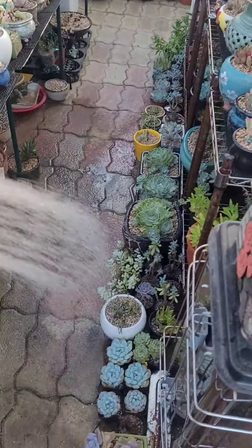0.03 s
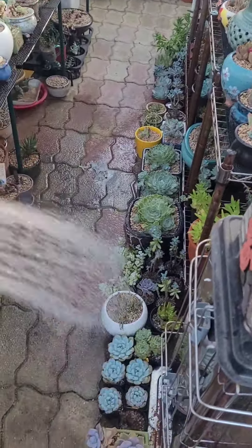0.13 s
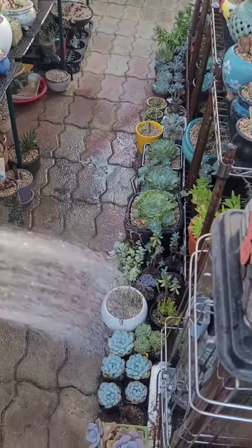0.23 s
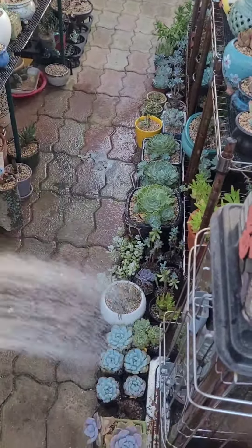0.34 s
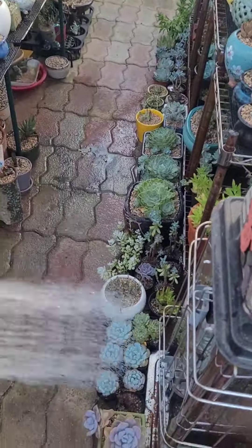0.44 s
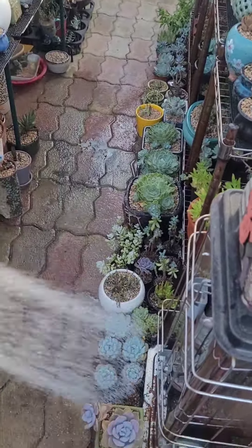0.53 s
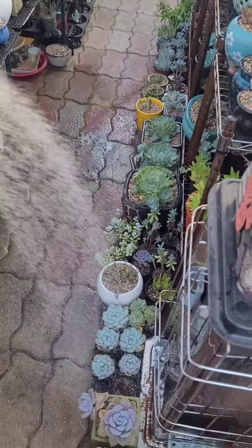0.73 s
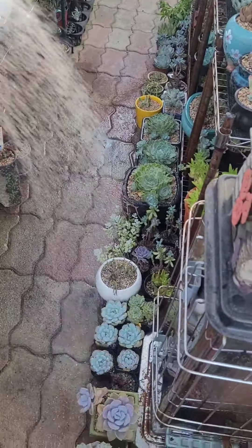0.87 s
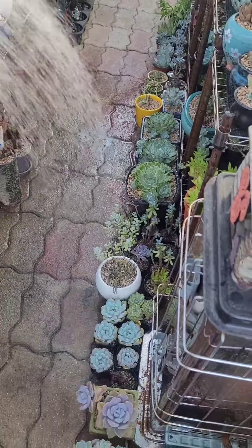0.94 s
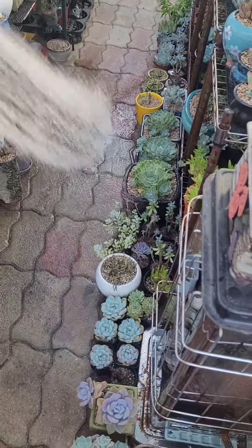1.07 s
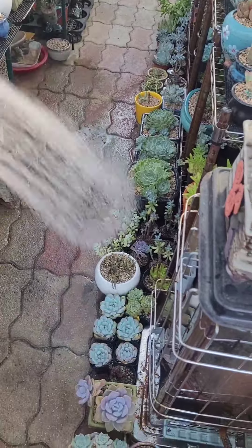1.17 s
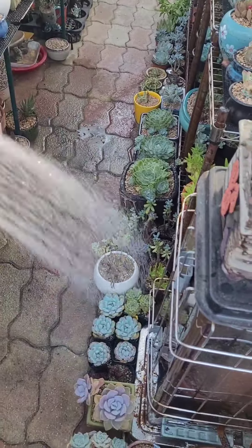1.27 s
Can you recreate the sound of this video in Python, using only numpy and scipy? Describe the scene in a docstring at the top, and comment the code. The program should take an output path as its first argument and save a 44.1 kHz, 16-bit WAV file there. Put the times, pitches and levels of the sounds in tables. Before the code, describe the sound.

Water from a hose hisses on the left in a yard, splashing lightly on a pot, then sweeping across leaves and paving. Low microphone handling rumble sits on the right, with light taps and a few dull thumps.

```python
"""Hose spray on plants and paving

On the left a fine spray sweeps over potted plants and paving; jet noise and tiny impacts make a hiss
whose colour follows the aim. Heavier drops patter on leaves, drum in a pot and a tub and ring on rims,
and gouts of water slap a pot. On the right the hand holding the microphone makes structure-borne
sound: a rumble, light taps and a few dull thumps, one of them firm."""
import sys
import numpy as np
from scipy import signal
from scipy.fft import rfft, irfft
from scipy.io import wavfile
from scipy.ndimage import uniform_filter1d, map_coordinates

SR = 44100
rng = np.random.default_rng(int(sys.argv[2]) if len(sys.argv) > 2 else 0)


def unload_wav(signal):
    """Save mono or channel-first audio to the path in sys.argv[1] as 16-bit WAV at rate SR, clipped to [-1, 1]."""
    wavfile.write(
        sys.argv[1],
        SR,
        np.round(np.clip(np.atleast_2d(signal).T, -1, 1) * 32767).astype(np.int16),
    )


N = 57330
TIME = np.arange(N) / SR
FREQS = np.arange(N // 2 + 1) * SR / N

# aim of the nozzle: (time [s], place [0 pots, 1 low plants, 2 air, 3 paving further off])
NOZZLE_AIM = [(0, 0), (.2, 0), (.28, .55), (.38, 1), (.67, 1), (.73, 1.7), (.86, 2.05), (.94, 3)]
# spectrum of the hiss at each place: (frequency [Hz], relative level [dB])
HISS_ON_POTS = [(1410, -18), (2400, -13), (2650, -15.5), (3250, -5), (4000, -10.5), (4350, -9), (4900, -10),
                (5800, -8.5), (6400, -9.5), (7900, -14.5), (8450, -6), (9200, -6), (10500, 2), (11200, -4),
                (12500, -8), (13300, -4.5), (15700, -8.5)]
HISS_ON_PLANTS = [(1410, -27), (2400, -9.5), (2800, -3.5), (3170, 4.5), (3550, -5), (4400, -4.5),
                  (4950, -4), (5230, -12.5), (5500, -3), (6100, 0), (6450, -7.5), (8000, -8), (8350, 0.5),
                  (9000, 4.5), (10400, 0.5), (11800, 1.5), (12500, -6.5), (13300, 2.5), (14800, -4),
                  (15700, -4)]
HISS_IN_AIR = [(1410, -47), (2400, -27), (2750, -24), (3100, -9), (4200, -7.5), (4900, -12.5), (5900, -9.5),
               (6300, -19), (6650, -9), (7900, -13.5), (8400, -7.5), (10400, 3.5), (11500, -4), (12600, -7),
               (13900, 0.5), (15700, -5)]
HISS_ON_PAVING = [(1410, -36), (2400, -10.5), (2950, -4.5), (3330, -10.5), (3550, -7.5), (3870, -12),
                  (4150, -5), (4450, -10), (5400, -8.5), (5900, -5.5), (6480, -13.5), (6900, -7.5),
                  (8100, -6.5), (9000, -1), (9950, 4), (11700, -5.5), (12400, 0), (13100, -3.5), (13900, 0),
                  (15700, -6.5)]
# envelope of the hiss: (time [s], relative level [dB])
HISS_ENVELOPE = [(0.0, -39.5), (0.24, -40), (0.37, -42.5), (0.405, -41), (0.66, -41.5), (.78, -40),
                 (.89, -41.5), (1.0, -40), (1.3, -41.5)]
# envelopes of the drops on leaves, in a pot and on a hollow tub: (time [s], level [dB])
LEAF_ENVELOPE = [(0, -52), (.15, -55), (.37, -61), (.42, -55.5), (.51, -50), (.56, -58), (.61, -54.5),
                 (.7, -58), (.86, -56.5), (.95, -68.5), (1.04, -58), (1.3, -56.5)]
POT_ENVELOPE = [(0, -50.5), (.13, -54.5), (.17, -59.5), (.31, -62.5), (.39, -68), (.65, -68.5),
                (.88, -63.5), (1.3, -83)]
TUB_ENVELOPE = [(0, -73.5), (.42, -63.5), (.57, -65), (.7, -75), (1.3, -84.5)]
# responses of those surfaces: (frequency [Hz], relative level [dB])
LEAF_SPECTRUM = [(600, -57), (1200, -13), (1600, -6.5), (2200, -0.5), (2800, -4.5), (3800, -25),
                 (8000, -44)]
POT_SPECTRUM = [(300, -29), (560, -12), (800, 0), (1300, -1), (1750, 0.5), (2400, -11), (5000, -34)]
TUB_SPECTRUM = [(200, -19.5), (340, -3.5), (460, -11), (570, -20), (1200, -53)]
# three notches in the spray's spectrum, one track each: (time [s], frequency [Hz], gain [dB])
NOTCH_TRACKS = [
    [(.24, 3850, 0), (.35, 4000, -8), (.45, 4120, -12), (.56, 4150, -14), (.72, 3850, 0)],
    [(0, 7050, -3), (.27, 7250, -14), (.41, 7250, -3), (.6, 7250, -1), (.7, 7100, -9), (.83, 7050, -6),
     (.9, 7000, 0)],
    [(.15, 9200, -1), (.3, 9350, -10), (.45, 9480, -9), (.67, 9350, -5), (.85, 8700, 0)],
]
# reflection from a surface that comes closer as the hose moves: (time [s], delay [s])
NEAR_DELAY = [(.8, .000978), (.96, .000932)]
# spectra of the yard, the covered microphone's hiss and the rumble: (frequency [Hz], relative level [dB])
YARD_SPECTRUM = [(58, 8.5), (110, -5), (200, 1), (600, -7.5), (1500, -4), (6000, -39)]
COVERED_SPECTRUM = [(1000, -17), (4000, -19), (7500, -29.5), (10500, -20), (13000, -2), (15800, -7)]
RUMBLE_SPECTRUM = [(10, -14.5), (24, -6), (37, -4.5), (54, 2), (68, -4), (88, -18.5), (125, -22.5),
                   (180, -38), (300, -44.5), (600, -61.5), (2000, -80)]
# envelope of the handling rumble: (time [s], level [dB])
RUMBLE_ENVELOPE = [(0, -31), (.1, -34), (.22, -31), (.4, -35.5), (.47, -34), (.53, -43), (.57, -33),
                   (.67, -35), (.72, -37.5), (.9, -39), (1.0, -36.5), (1.1, -38.5), (1.23, -36.5),
                   (1.3, -42.5)]
# finger taps on the casing: (time [s], impulse level [dB])
FINGER_TAPS = [(0.057, -48.5), (0.194, -46), (0.235, -45), (.258, -44.5), (0.29, -46.5), (0.411, -57)]
# casing modes excited by a tap: (frequency [Hz], gain [dB], T60 [s])
LOW_CASING_MODES = [(134, 12.5, 0.013), (216, 4, 0.02)]
# gouts of water hitting a pot: (time [s], smack level [dB], splash level [dB], splash T60 [s])
GOUTS = [(.09, -35, -44, 0.039), (.1215, -42, -54, 0.02), (.1285, -37, -50, 0.022),
         (0.2093, -31.5, -41, 0.075), (0.2312, -41, -47, 0.028), (1.02, -61, -55, 0.15),
         (1.244, -67, -57, 0.059)]
# spectrum of their splash: (frequency [Hz], relative level [dB])
SPLASH_SPECTRUM = [(400, -31), (750, -1), (1600, 1), (2100, 8.5), (2700, -14), (6000, -39)]
# large drops striking rims: (time [s], frequency [Hz], level [dB])
RIM_DROPS = [(.209, 2027, -38), (.419, 2260, -42), (1.04, 2050, -49), (1.128, 2580, -38.5),
             (1.164, 2800, -38.5)]
# bumps on the casing, the firm one first: (time [s], level [dB], attack [s], initial pitch offset [Hz])
CASING_BUMPS = [(0.3247, -7.5, 0.0045, 107), (0.372, -25, 0.0059, 12), (0.616, -28.5, 0.011, 12),
                (1.136, -27, 0.011, -22)]
# casing modes excited by the firm bump: (frequency [Hz], level [dB], T60 [s])
HIGH_CASING_MODES = [(468, -43.5, 0.076), (696, -56, 0.078), (940, -55, 0.035)]


def from_db(db):
    """Amplitude grows tenfold for every 20 dB."""
    return 10 ** (np.asarray(db) / 20)


def rms_one(x):
    """Normalisation to unit rms fixes the mean power."""
    return x / np.sqrt(np.mean(x ** 2) + 1e-20)


def in_time(rows):
    """Linear interpolation joins (time, value) rows into a curve."""
    return np.interp(TIME, *np.transpose(rows))


def coloured(x, spectrum):
    """Filtering multiplies the spectrum of x by a response; the result has unit rms."""
    hz, db = np.transpose(spectrum)
    response = from_db(np.interp(np.log(FREQS + 1), np.log(hz), db))
    return rms_one(irfft(rfft(x) * response, N))


def noise():
    """Independent samples have a flat mean spectrum: white noise."""
    return rng.standard_normal(N)


def drift(corner_hz):
    """Low-pass filtering turns noise into a slow fluctuation of unit rms."""
    return rms_one(irfft(rfft(noise()) / (1 + (FREQS / corner_hz) ** 2), N))


def drops(per_s, spread_db):
    """Independent impacts form shot noise of unit rms; a spread makes a few of them larger."""
    sizes = from_db(spread_db * np.minimum(rng.exponential(1, N), 4))
    signs = rng.choice([-1, 1], N)
    hits = rng.random(N) < per_s / SR
    return rms_one(sizes * signs * hits)


def decay(age, t60):
    """Damping lowers a vibration exponentially, by 60 dB in t60 seconds."""
    return np.exp(-np.log(1000) * age / t60)


def ring(clicks, hz, t60):
    """A damped resonator answers a unit impulse with a sine decaying from height 1."""
    radius, angle = decay(1 / SR, t60), 2 * np.pi * hz / SR
    return signal.lfilter([0, np.sin(angle)], [1, -2 * radius * np.cos(angle), radius ** 2], clicks)


def mist(droplet_share=0.31, low_cut_hz=2170, gain_db=6, flutter_db=1):
    """Incoherent sources add in power: jet noise and fine droplets, coloured by the nozzle's aim."""
    aim, hiss = in_time(NOZZLE_AIM), 0
    for place, spectrum in enumerate((HISS_ON_POTS, HISS_ON_PLANTS, HISS_IN_AIR, HISS_ON_PAVING)):
        jet = np.sqrt(1 - droplet_share) * noise()
        droplets = np.sqrt(droplet_share) * drops(per_s=12000, spread_db=2.5)
        crossfade = np.sqrt(np.maximum(1 - abs(aim - place), 0))
        hiss = hiss + crossfade * coloured(jet + droplets, spectrum)
    hiss = signal.sosfilt(signal.butter(3, low_cut_hz, "high", fs=SR, output="sos"), hiss)
    return hiss * from_db(in_time(HISS_ENVELOPE) + gain_db + flutter_db * drift(corner_hz=20))


def patter():
    """Impact excitation: leaves, pot and tub each filter the heavier drops by their own response."""
    leaves = coloured(drops(per_s=900, spread_db=1), LEAF_SPECTRUM) * from_db(in_time(LEAF_ENVELOPE))
    pot = coloured(drops(per_s=1200, spread_db=0), POT_SPECTRUM) * from_db(in_time(POT_ENVELOPE))
    tub = coloured(drops(per_s=1200, spread_db=0), TUB_SPECTRUM) * from_db(in_time(TUB_ENVELOPE))
    return leaves + pot + tub


def sliding_notches(x, width_hz=330):
    """Cancellation hollows out narrow bands, which slide and deepen as the jet moves."""
    lowpass = signal.butter(2, width_hz / 2, fs=SR)
    for track in NOTCH_TRACKS:
        times, hz, db = np.transpose(track)
        carrier = np.exp(2j * np.pi * np.cumsum(np.interp(TIME, times, hz)) / SR)
        # shift the band down to 0 Hz, isolate it and shift it back
        baseband = signal.filtfilt(*lowpass, x / carrier, padtype="even")
        band = 2 * np.real(carrier * baseband)
        x = x - (1 - from_db(np.interp(TIME, times, db))) * band
    return x


def early_reflections(x, far_delay_s=0.001268, gain_db=-25):
    """Interference with inverted reflections from two nearby surfaces comb-filters the spray."""
    reflected = sum(map_coordinates(x, [(TIME - delay) * SR], order=3, mode="mirror")
                    for delay in (in_time(NEAR_DELAY), far_delay_s))
    return x - from_db(gain_db) * reflected


def background(spectrum, level_db):
    """Stationary noise makes a faint floor of constant colour and level."""
    return from_db(level_db) * coloured(noise(), spectrum)


def rumble(smoothing_s=0.08):
    """Forced vibration: the grip shakes the casing around its low resonance."""
    shake = coloured(noise(), RUMBLE_SPECTRUM)
    power = np.abs(signal.hilbert(shake)) ** 2
    for _ in range(2):
        power = uniform_filter1d(power, int(smoothing_s * SR))
    steady_shake = rms_one(shake / np.sqrt(power))  # the grip keeps an even pressure
    return steady_shake * from_db(in_time(RUMBLE_ENVELOPE))


def taps(cutoff_hz=365):
    """Fingers excite the casing's low modes; a soft contact passes no treble."""
    clicks = np.zeros(N)
    for onset, db in FINGER_TAPS:
        clicks[int(onset * SR)] = from_db(db)
    rings = sum(from_db(db) * ring(clicks, hz, t60) for hz, db, t60 in LOW_CASING_MODES)
    return signal.sosfilt(signal.butter(4, cutoff_hz, fs=SR, output="sos"), rings)


def slaps(low_hz=785, high_hz=2440, rise_s=0.0016):
    """Each gout's impact radiates a band-limited pulse, the smack, then a splash of decaying noise."""
    splash_envelope, clicks = np.zeros(N), np.zeros(N)
    for onset, smack_db, splash_db, t60 in GOUTS:
        age = np.maximum(TIME - onset, 0)
        splash_envelope += from_db(splash_db) * np.minimum(age / rise_s, 1) * decay(age, t60)
        clicks[int(onset * SR)] = from_db(smack_db)
    bandpass = signal.butter(2, [low_hz, high_hz], "band", fs=SR, output="sos")
    makeup_gain = SR / (2 * (high_hz - low_hz))  # a pulse loses height with its bandwidth
    smacks = makeup_gain * signal.sosfilt(bandpass, clicks)
    return smacks + splash_envelope * coloured(noise(), SPLASH_SPECTRUM)


def plinks(rise_s=0.0012, t60_s=0.054):
    """Free vibration: a rim struck by a large drop rings briefly at its natural frequency."""
    rings = np.zeros(N)
    for onset, hz, db in RIM_DROPS:
        age = np.maximum(TIME - onset, 0)
        envelope = (1 - np.exp(-age / rise_s)) * decay(age, t60_s)
        rings += from_db(db) * envelope * np.sin(2 * np.pi * hz * age)
    return rings


def thump(onset, db, attack_s, offset_hz, rest_hz=56.6, relax_s=0.0049, hold_s=0.015, release_s=0.036):
    """A bump starts a low oscillation, damped by the hand; its pitch settles as the contact relaxes."""
    age = np.maximum(TIME - onset, 0)
    cycles = rest_hz * age + offset_hz * relax_s * (1 - np.exp(-age / relax_s))
    attack = np.sin(np.pi / 2 * np.minimum(age / attack_s, 1)) ** 2
    release = np.cos(np.pi / 2 * np.clip((age - hold_s) / release_s, 0, 1)) ** 2
    return -from_db(db) * attack * release * np.sin(2 * np.pi * cycles)


def knock():
    """Impulse response: the firm bump also rings the casing's higher modes."""
    click = np.zeros(N)
    click[int(CASING_BUMPS[0][0] * SR)] = 1
    return sum(from_db(db) * ring(click, hz, t60) for hz, db, t60 in HIGH_CASING_MODES)


def scene():
    """Sources add by superposition: water and yard on the left, handling and faint hiss on the right."""
    spray = early_reflections(sliding_notches(mist() + patter()))
    left = spray + slaps() + plinks() + background(YARD_SPECTRUM, level_db=-69.5)
    handling = rumble() + taps() + sum(thump(*bump) for bump in CASING_BUMPS) + knock()
    right = handling + background(COVERED_SPECTRUM, level_db=-67)
    return np.array([left, right])


def record(dry):
    """Band limiting: a steep low-pass filter removes the highest treble."""
    lowpass = signal.firwin(401, cutoff=15900, window=("kaiser", 8), fs=SR)
    return signal.fftconvolve(dry, lowpass[None], mode="same", axes=1)


dry = scene()
out = record(dry)
unload_wav(out)
```